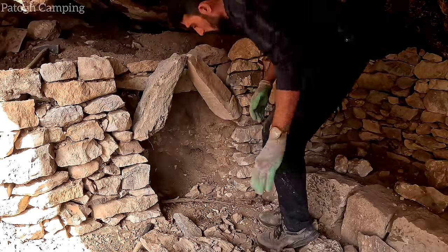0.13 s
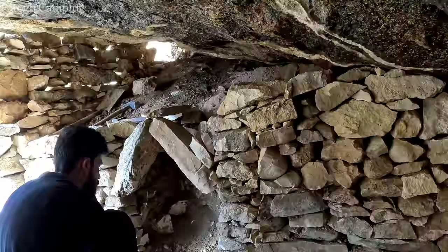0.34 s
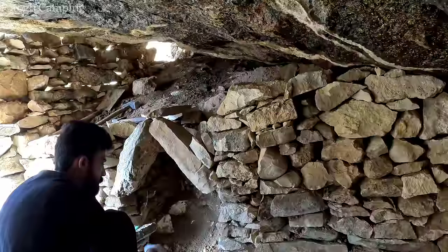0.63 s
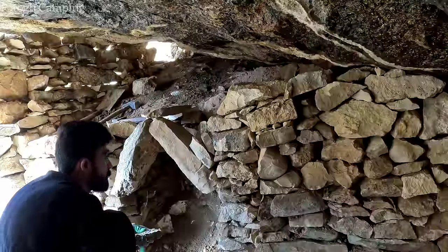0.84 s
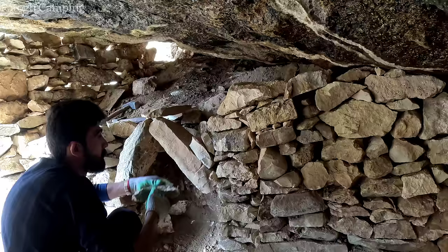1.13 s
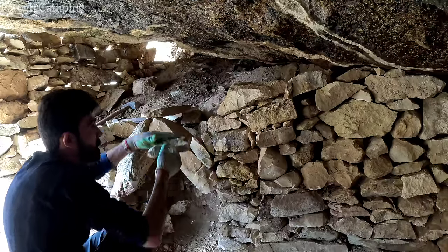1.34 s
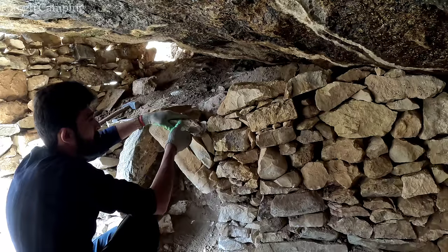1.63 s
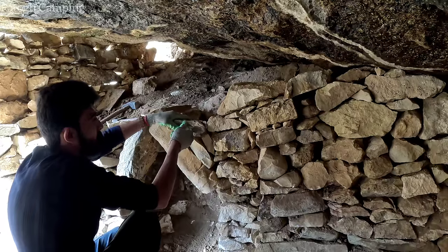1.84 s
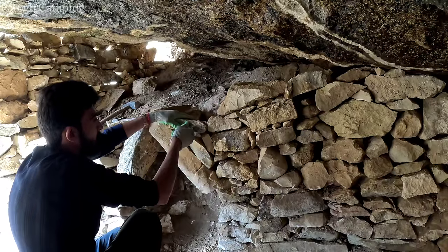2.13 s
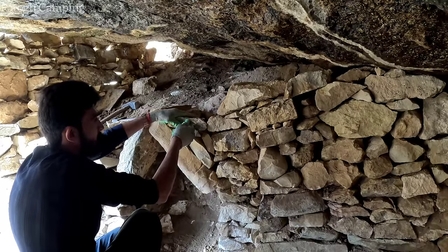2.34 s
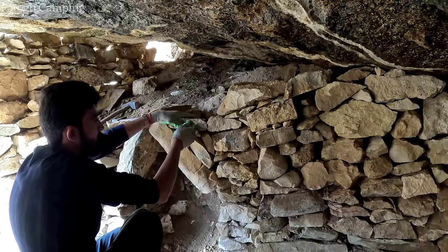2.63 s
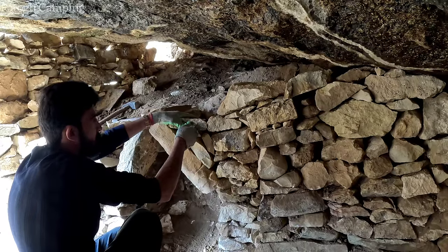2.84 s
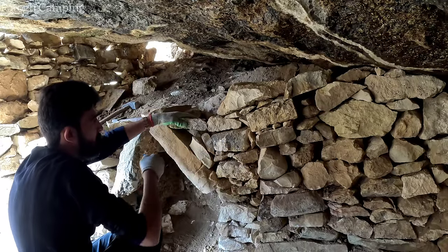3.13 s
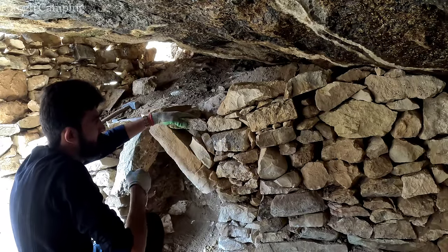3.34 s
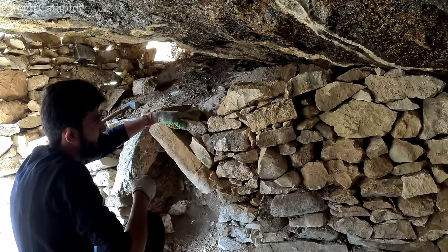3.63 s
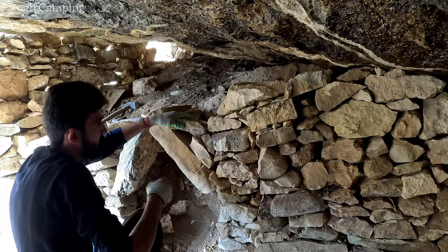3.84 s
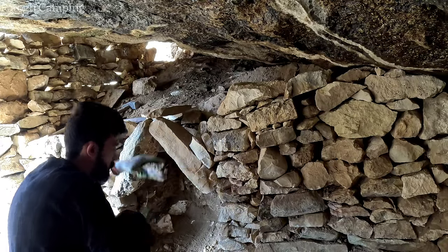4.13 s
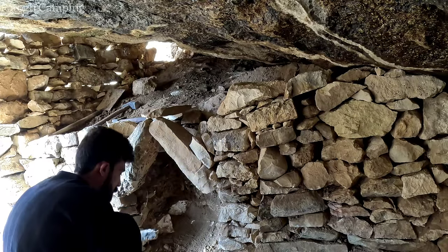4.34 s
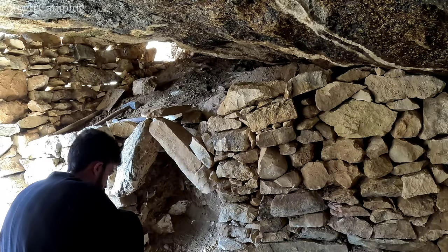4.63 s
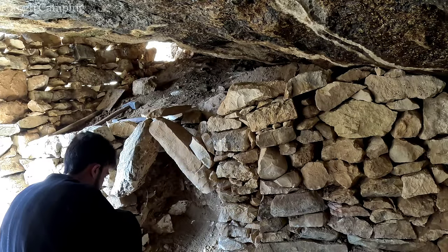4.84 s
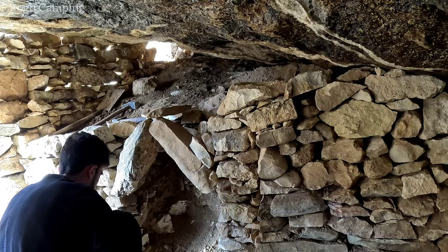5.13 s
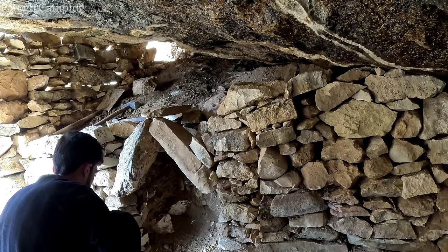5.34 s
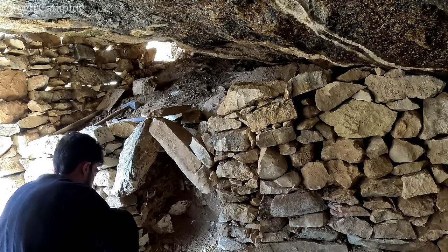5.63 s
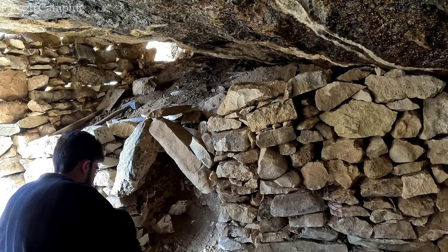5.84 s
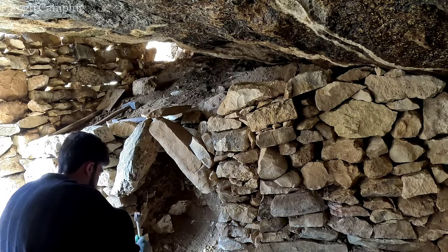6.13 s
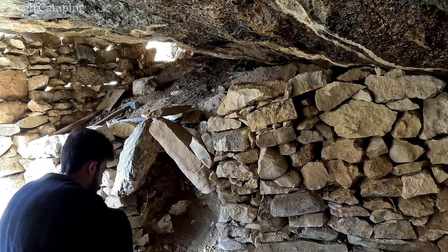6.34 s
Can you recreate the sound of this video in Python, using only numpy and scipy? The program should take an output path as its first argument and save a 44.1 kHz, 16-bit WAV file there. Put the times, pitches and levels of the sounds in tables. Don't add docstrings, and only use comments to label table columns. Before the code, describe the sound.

Dry stones clack and settle inside a rocky hollow, with soft sleeve rustle and faint breeze, building to three hard, heavy stone blows.

```python
import sys
import numpy as np
from scipy import signal
from scipy.fft import rfft, irfft, next_fast_len
from scipy.io import wavfile
from scipy.ndimage import uniform_filter1d

SR = 44100
rng = np.random.default_rng(int(sys.argv[2]) if len(sys.argv) > 2 else 0)


def invert_db(x):
    u = np.asarray(x, float) / 20
    return 10 ** u


def put_to_file(sound):
    columns = np.atleast_2d(sound).T
    safe = np.clip(columns, -1, 1)
    whole_steps = np.round(safe * 32767)
    wavfile.write(sys.argv[1], SR, whole_steps.astype(np.int16))


N = 285327
CUT_S = 0.266


def curve(table, hz):
    f, db = np.transpose(table)
    return invert_db(np.interp(np.log(hz + 1), np.log(f), db))


def band(size, lo_hz, hi_hz, colour=None):
    hz = np.fft.rfftfreq(size, 1 / SR) + 1e-3
    gain = 1 / np.sqrt((1 + (lo_hz / hz) ** 12) * (1 + (hz / hi_hz) ** 12))
    if colour:
        gain = gain * curve(colour, hz)
    x = irfft(rfft(rng.standard_normal(size)) * gain, size)
    return x / x.std()


def walk(rate):
    hold = int(SR / rate)
    levels = rng.standard_normal(N // 20)[:N // hold + 1]
    return 1.2 * uniform_filter1d(np.repeat(levels, hold), hold)[:N]


def add(out, s, x):
    i = int(s * SR)
    out[..., i:i + x.shape[-1]] += x[..., :out.shape[-1] - i]


def ring(modes, push, scatter_db):
    t = np.arange(8192) / SR
    hz, db, t60 = np.transpose(modes)[:, :, None]
    chance = rng.standard_normal((2, len(modes), 1))
    hz = hz * (1 + 0.001 * chance[1])
    share = np.abs(rfft(push, 8192))[(hz * 8192 / SR).astype(int)]
    decay = invert_db(db + scatter_db * chance[0] - 60 * t / t60)
    body = decay * np.sin(2 * np.pi * hz * t) / (share + 0.4 * share.mean())
    y = signal.fftconvolve(push, body.sum(axis=0))[:8192]
    return y / np.abs(y).max()


def bed(gains, colour, edges_hz, flicker_db, rate):
    out, shared = 0, walk(rate)
    for gain, lo, hi in zip(gains, edges_hz, edges_hz[1:]):
        rough = invert_db(flicker_db * (shared + 1.46 * walk(4 * rate)))
        pair = np.array([band(next_fast_len(N), lo, hi, colour)[:N] for _ in range(2)])
        out = out + gain * rough * pair
    return out


# start_s [s], gust_db [dB]
GUSTS = [(0.0, -57.5), (.13, -46.5), (0.36, -69), (0.859, -67.5), (1.66, -74), (2.139, -61.5),
         (2.721, -60.5), (2.9, -71.5), (3.5, -72.5), (3.691, -49.5), (3.86, -55), (3.95, -79), (4.36, -55),
         (4.921, -62.5), (5.28, -62.5), (5.8, -53.5), (6.001, -42), (6.47, -51.5)]
# freq_hz [Hz], density_db [dB per Hz]
AIR_COLOUR = [(18, -3.5), (38, -21), (62, -30), (105, -34), (140, -6), (190, -3.5), (350, -18.5),
              (900, -27)]
HUM_DB, HUM_GUST_SHARE = -41, 0.45
HUM_AFTER_THUD_DB, HUM_T60_S = -30.5, 0.42
AIR_FLICKER_DB = 1.5


def air():
    gust_db = np.interp(np.arange(N) / SR, *np.transpose(GUSTS))
    t = np.arange(SR) / SR
    hum = invert_db(HUM_DB + HUM_GUST_SHARE * np.minimum(gust_db, -60)) ** 2
    for s, db, _, _ in THUDS:
        add(hum, s, invert_db(db + HUM_AFTER_THUD_DB - 60 * t / HUM_T60_S) ** 2)
    gains = invert_db(gust_db), np.sqrt(hum)
    return bed(gains, AIR_COLOUR, [18, 70, 850], AIR_FLICKER_DB, 9)


# start_s [s], length_s
# [s], level_db [dB], fineness_db [dB]
RUBS = [(0, 0.16, -63, -0.5), (.19, .09, -71, 2.5), (0.323, 0.079, -76.5, 5), (0.428, 0.13, -64, -10),
        (0.553, 0.047, -65.5, -3.5), (1.009, 0.14, -67, -4.5), (1.174, 0.31, -66, -3),
        (1.348, 0.041, -58, -6.5), (1.476, 0.2, -70.5, -2), (1.922, 0.16, -69.5, -3.5),
        (5.119, 0.048, -64.5, -6.5), (3.986, 0.13, -78, 4.5), (4.072, 0.17, -61.5, -5.5),
        (4.27, 0.23, -67.5, -5), (4.514, 0.13, -62, -2.5), (4.709, 0.074, -62.5, -6.5),
        (4.827, 0.19, -60.5, -5.5), (5.247, 0.1, -64.5, -1.5), (5.384, 0.24, -62, -6),
        (5.66, 0.087, -65.5, 4), (5.788, 0.004, -49.5, 6.5), (5.79, 0.31, -68.5, -1.5),
        (6.131, 0.33, -66.5, -2)]
# freq_hz [Hz], density_db [dB per Hz]
WEAVE = [(800, -21), (1020, -8), (1250, -5), (1750, -10.5), (4370, -17), (7550, -13.5), (9440, -27),
         (15500, -44)]
STILL_DB = (-78, -82.5, -77)
RUB_ATTACK_S, RUB_RELEASE_S, RUB_MID_DB = 0.028, 0.027, 2.5
CLOTH_FLICKER_DB = 1.2


def cloth():
    t = np.arange(SR) / SR
    power = np.ones(N) * invert_db(np.array(STILL_DB))[:, None] ** 2
    for s, length, db, fine in RUBS:
        shape = np.minimum(t / RUB_ATTACK_S, 1) * np.exp(-np.maximum(t - length, 0) / RUB_RELEASE_S)
        if s < CUT_S:
            shape = shape[:int((CUT_S - s) * SR)]
        levels = db + np.array([[0], [RUB_MID_DB + fine], [fine]])
        add(power, s, (invert_db(levels) * shape) ** 2)
    return bed(np.sqrt(power), WEAVE, [850, 2000, 4500, 15500], CLOTH_FLICKER_DB, 30)


ROOF_T60_S, ROOF_DB, ROOF_DELAY_MS = 0.092, -17, 4.6


def roof(x):
    t = np.arange(12000) / SR
    echoes = []
    for _ in range(2):
        tail = band(len(t), 190, 6300) * invert_db(-60 * t / ROOF_T60_S) * (t > ROOF_DELAY_MS / 1000)
        echoes.append(signal.fftconvolve(x, tail / np.sqrt(np.sum(tail ** 2)))[:N])
    return np.array(echoes) * invert_db(ROOF_DB)


# freq_hz [Hz], level_db [dB]; then its decay
NEAR_STONES, NEAR_T60_S = [(300, -18), (1500, -14), (7000, -15), (11000, -3)], 0.02


def near(x):
    t = np.arange(2048) / SR
    h = rng.standard_normal(len(t)) * invert_db(-60 * t / NEAR_T60_S)
    h = h / np.sqrt(np.sum(h ** 2))
    return irfft(rfft(x) * rfft(h, N) * curve(NEAR_STONES, np.fft.rfftfreq(N, 1 / SR)), N)


# freq_hz [Hz], level_db [dB]
LEFT_LOUDER = [(200, 0), (380, .5), (550, -1.5), (900, 2.5), (2380, 2), (4400, 0), (8120, 2), (15000, 14)]
# freq_hz [Hz], phase_rad [radians]
LEFT_LEADS = [(100, -.05), (300, -.12), (900, -.15), (1720, -.65), (3000, -.8), (4800, -.35), (9100, 0)]


def ports(x):
    hz = np.fft.rfftfreq(N, 1 / SR)
    f, lead = np.transpose(LEFT_LEADS)
    phase = np.interp(np.log(hz + 1), np.log(f), lead)
    half = np.sqrt(curve(LEFT_LOUDER, hz)) * np.exp(0.5j * phase)
    return np.array([irfft(rfft(x) * half, N), irfft(rfft(x) / half, N)])


# start_s [s], peak_db [dB], swing_hz [Hz]
STAND_TAPS = [
    (0.6217, -31, 223),
    (1.221, -36, 197),
    (1.917, -41, 257),
    (1.9273, -16, 228),
]


def stand():
    out, t = np.zeros((2, N)), np.arange(4096) / SR
    sides = invert_db(np.array([[-0.6], [0.6]]))
    for s, db, hz in STAND_TAPS:
        dip = -0.6 * np.exp(-((t - 0.001) / 0.000092) ** 2)
        u = np.maximum(t - 0.0012, 0)
        swing = 1.01 * np.cos(2 * np.pi * hz * u) * np.exp(-u / 0.0017) - 0.5 * np.exp(-u / 0.0018)
        swing = (1 - np.exp(-u / 0.000091)) * swing
        late = np.maximum(t - 0.008, 0)
        settle = 0.2 * (1 - np.exp(-late / 0.0067)) * np.exp(-late / 0.0096)
        add(out, s - 0.001, (dip + swing + settle) * invert_db(db) * sides)
    return out


# start_s [s], peak_db [dB], pitch_hz [Hz], t60_s [s]
THUDS = [(0.068, -30.5, 167.2, 0.2), (0.306, -25.5, 200.4, 0.15), (0.322, -28, 217, 0.11),
         (.432, -35.5, 213, 0.098), (0.456, -36, 182, 0.086), (0.548, -31.5, 190, 0.043),
         (0.571, -33, 216, 0.19), (0.689, -34.5, 179, 0.15), (1.034, -43.5, 174.5, 0.29),
         (2.226, -42, 238, 0.091), (2.62, -46.5, 74.8, 0.17), (2.785, -40, 104, 0.11),
         (3.537, -37, 95.6, 0.39), (3.576, -29.5, 170, 0.018), (3.669, -27, 233, 0.14),
         (4.405, -41.5, 97.5, 0.079), (4.467, -44.5, 175, 0.34), (4.781, -20.5, 133, 0.07),
         (4.801, -29, 96, 0.16), (4.841, -34, 198.6, 0.3), (4.894, -27, 79, 0.14),
         (4.962, -32.5, 106, 0.23), (5.073, -20.5, 272, 0.087), (5.439, -36, 173, 0.26),
         (5.51, -36.5, 197, 0.14), (5.685, -33.5, 184, 0.12), (5.791, -25, 123, 0.18),
         (5.881, -26.5, 155, 0.047), (5.916, -16, 118, 0.094), (6.155, -38, 87.3, 0.49),
         (6.299, -30.5, 118.6, 0.18), (6.345, -10.5, 118, 0.1), (5.792, -24.5, 196, 0.14),
         (5.917, -15.5, 194, 0.079), (6.346, -16, 189, 0.092)]
# start_s [s], peak_db [dB], pitch_hz [Hz], t60_s [s]
STEPS = [
    (0.082, -34, 115, 0.23),
    (0.18, -44.5, 150, 0.17),
    (0.56, -38, 88, 0.48),
    (0.16, -40, 80, 0.27),
    (0.25, -34.5, 580, 0.26),
]
# freq_hz [Hz], level_db [dB]
HOLLOW = [(165, -5), (245, -11), (95, -14)]
SOIL_RISE_S = 0.004


def ground():
    out = np.zeros(N)
    for s, db, hz, t60 in THUDS + STEPS:
        modes = [(hz, 0, t60)] + [(f, g, t60) for f, g in HOLLOW]
        y = ring(modes, np.hanning(256), 2.0)
        y = invert_db(db) * y * (1 - np.exp(-np.arange(len(y)) / SR / SOIL_RISE_S))
        if s < CUT_S:
            y = y[:int((CUT_S - s) * SR)]
        add(out, s, y)
    return signal.sosfilt(signal.butter(2, 62, "high", fs=SR, output="sos"), out)


# start_s [s], peak_db [dB], coarseness_db [dB], t60_s [s]
CRUNCHES = [(0.001, -40.5, 0, 0.1), (0.037, -31.5, -19, 0.087), (0.0472, -40.5, 3.5, 0.3),
            (0.065, -41, 13, 0.14), (0.0797, -33, 7, 0.089), (0.0907, -21, -10.5, 0.061),
            (0.163, -40, -3.5, 0.22), (0.818, -49.5, -16, 0.26), (1.0407, -51, -14, 0.14),
            (1.096, -49.5, -9, 0.035), (1.3707, -62.5, 10.5, 0.087), (2.135, -57, 0.5, 0.091),
            (2.207, -74.5, 28.5, 0.14), (2.379, -43, -42, 0.088), (2.4224, -43, -37, 0.074),
            (2.734, -53, -8.5, 0.44), (2.7669, -58, 10, 0.14), (2.9568, -54.5, -6.5, 0.12),
            (3.069, -56, -28, 0.13), (3.6947, -65.5, 30, 0.036), (3.8568, -52, -14.5, 0.18),
            (4.5088, -51, -19, 0.68), (5.46, -52, -1, 0.32)]
# freq_hz [Hz], density_db [dB per Hz]
GRIT = [(2350, -44), (4000, -21), (4660, -27), (4960, -8), (7900, -3.5), (9360, -21.5), (10500, -22),
        (15500, -56)]
COARSE_SHARE, COARSE_MID_DB, COARSE_TOP_DB = 0.79, -9, -7


def grit():
    out, t = np.zeros(N), np.arange(8192) / SR
    for s, high, coarse, t60 in CRUNCHES:
        low = high + coarse
        mid = high + COARSE_SHARE * min(coarse, COARSE_TOP_DB) + COARSE_MID_DB
        grains = uniform_filter1d(invert_db(np.repeat(rng.standard_normal(128), 64)), 48)
        mix = invert_db(high - 7.5) * band(8192, 4000, 17000, GRIT)
        mix += invert_db(low - 7) * band(8192, 210, 1320)
        mix += invert_db(mid + 6) * band(8192, 1300, 4500)
        shape = np.minimum(t / 0.00032, 1) * invert_db(-60 * t / max(t60, 0.01))
        add(out, s - 0.001, mix * grains * shape)
    return out


# start_s [s], length_s [s], level_db [dB], from_hz [Hz], to_hz [Hz]
DRAGS = [(1.24, 0.18, -68.5, 1200, 1157), (1.369, 0.12, -68, 2450, 2565), (1.528, 0.2, -72.5, 1400, 1313),
         (2.036, 0.12, -74, 1150, 1250), (2.725, 0.055, -63, 1310, 1474), (2.737, 0.052, -68, 2400, 2340),
         (2.937, 0.039, -69, 1620, 1480), (4.029, 0.06, -72.5, 1420, 1330), (4.096, 0.096, -69, 1133, 1397),
         (4.098, 0.13, -73, 2560, 2740), (4.193, 0.033, -60, 1283, 1450), (5.968, 0.23, -68.5, 1910, 1515)]
DRAG_WIDTH_SHARE, DRAG_GRAIN_DB, DRAG_EDGE_S = 0.14, 4, 0.0026


def drags():
    out, t = np.zeros(N), np.arange(16384) / SR
    for s, length, db, from_hz, to_hz in DRAGS:
        hz = from_hz + (to_hz - from_hz) * np.minimum(t / length, 1)
        turn = 2 * np.pi * np.cumsum(hz) / SR
        a, b = (band(len(t), 1, DRAG_WIDTH_SHARE * from_hz) for _ in range(2))
        grains = uniform_filter1d(invert_db(DRAG_GRAIN_DB * np.repeat(rng.standard_normal(64), 256)), 128)
        shape = np.clip(np.minimum(t, length + DRAG_EDGE_S - t) / DRAG_EDGE_S, 0, 1)
        add(out, s, invert_db(db) * shape * grains * (a * np.cos(turn) + b * np.sin(turn)))
    return out


# start_s [s], peak_db [dB]
TOUCHES = [(2.432, -50), (2.462, -68.5), (2.5, -68.5), (3.488, -66), (3.506, -58), (3.54, -42.5),
           (3.565, -70), (3.589, -61), (3.622, -56.5), (3.65, -85), (3.68, -66)]


def touches():
    out = np.zeros(N)
    for s, db in TOUCHES:
        push = np.hanning(512) * rng.standard_normal(512)
        add(out, s - 0.003, invert_db(db) * ring([(5120, 2, 0.053), (6600, -23.5, 0.058)], push, 1.2))
    return out


# start_s [s], peak_db [dB], from_hz [Hz], to_hz [Hz], t60_s [s]
SPECKS = [
    (0.3069, -36.5, 8150, 10600, .06),
    (3.07, -61.5, 4610, 6260, 0.079),
    (3.254, -54.5, 3200, 4240, 0.094),
    (3.856, -58.5, 8370, 10340, 0.066),
    (4.783, -57, 10500, 12300, 0.083),
    (5.657, -61, 9900, 12500, 0.056),
    (.307, -64, 12900, 14500, .12),
    (5.798, -35.5, 4500, 9300, 0.085),
    (6.343, -39.5, 6900, 8250, 0.049),
]


def specks():
    out, t = np.zeros(N), np.arange(8192) / SR
    for s, db, lo_hz, hi_hz, t60 in SPECKS:
        shape = invert_db(db - 60 * t / t60) * np.minimum(t / 0.00086, 1)
        add(out, s - 0.001, shape * band(len(t), lo_hz, hi_hz))
    return out


# start_s [s], peak_db [dB], pitch_hz [Hz], t60_s [s]
CRACKS = [
    (0.3052, -13, 3210, .006),
    (0.3063, -17, 3347, .025),
    (0.3109, -19.5, 2806, .02),
    (5.9176, -8.5, 1750, .008),
]


def cracks():
    out, t = np.zeros(N), np.arange(2048) / SR
    for s, db, hz, t60 in CRACKS:
        tone = np.sin(2 * np.pi * hz * t) * np.minimum(t * hz, 1)
        add(out, s, invert_db(db - 60 * t / t60) * tone)
    return out


# start_s [s], peak_db [dB], pitch_hz [Hz], t60_s [s]
CLINKS = [(0.309, -25.5, 1690, 0.031), (.308, -47, 770, 0.14), (.46, -28, 863, 0.02),
          (.46, -39, 3580, 0.023), (.494, -47, 1970, 0.12), (.494, -36.5, 941, .05), (.52, -50, 3680, .04),
          (0.55, -36, 1000, 0.019), (.552, -48, 3620, 0.018), (.567, -48, 794, 0.052),
          (.581, -45, 3630, .025), (0.687, -41, 3570, 0.029), (3.51, -62, 2653, .12),
          (3.512, -51, 477, 0.057), (3.537, -32.5, 1230, 0.016), (3.576, -37, 1060, 0.049),
          (3.655, -55.5, 835, 0.027), (3.667, -40.5, 2270, 0.024), (3.667, -33, 814, 0.022),
          (3.694, -39, 512, 0.07), (3.51, -58, 3660, 0.11), (3.668, -49.5, 3120, 0.026),
          (4.782, -30, 7900, 0.055), (4.782, -32, 5518, 0.035), (4.781, -48, 6595, .06),
          (4.782, -33, 5100, 0.11), (4.844, -30.5, 6580, 0.059), (4.843, -38, 4980, .06),
          (4.944, -42.5, 1780, 0.046), (4.945, -41, 1000, 0.024), (5.069, -26.5, 5130, 0.051),
          (5.071, -27.5, 6560, 0.036), (5.071, -23.5, 1244, 0.045), (5.127, -44.5, 6630, 0.052),
          (5.974, -41, 810, 0.026), (5.975, -44, 1403, 0.05), (6.113, -56, 6630, 0.051)]
CLINK_PUSH_MS = 2.4
BEAT_SHARE, BEAT_DEPTH = 0.012, 0.6


def clinks():
    out, size = np.zeros(N), int(CLINK_PUSH_MS * SR / 1000)
    for s, db, hz, t60 in CLINKS:
        y = ring([(hz, 0, t60)], np.hanning(size) * rng.standard_normal(512)[:size], 0)
        t = np.arange(len(y)) / SR
        y = y * (1 - BEAT_DEPTH * np.sin(np.pi * BEAT_SHARE * hz * t) ** 2)
        around = signal.butter(2, [0.8 * hz, 1.2 * hz], "band", fs=SR, output="sos")
        add(out, s - 0.002, invert_db(db) * signal.sosfilt(around, y))
    return out


SOFT_BLUR, SOFT_BELOW_DB = 0.4, -32


def knocks(hits, modes, blur, offset_db, scatter_db, dense_db, dense_t60, edge_share):
    out, t = np.zeros(N), np.arange(8192) / SR
    edges = ((820, 2100), (2100, 4600), (4600, 14000))
    for s, low, edge, seat, ms in hits:
        tau = max(ms, 0.3) / 1000
        clear = invert_db(SOFT_BLUR * min(low - SOFT_BELOW_DB, 0))
        spray = np.sqrt(t / tau) * np.exp(0.5 - 0.5 * t / tau)
        chatter = rng.standard_normal(len(t)) * spray ** 2
        tail = np.minimum(t / tau, 1) * 0.38 * invert_db(-60 * t / dense_t60)
        fade = np.maximum(spray ** 2, tail)
        levels = low, low + edge + offset_db[1], low + edge_share * edge + offset_db[2]
        for (lo, hi), db, dense in zip(edges, levels, dense_db):
            y = ring([m for m in modes if lo <= m[0] < hi], chatter, scatter_db)
            y = signal.sosfilt(signal.butter(3, [lo, min(1.1 * hi, 8800)], "band", fs=SR, output="sos"), y)
            add(out, s - 0.0018, invert_db(db) * (clear * y + invert_db(dense) * band(len(t), lo, hi, blur) * fade))
        add(out, s - 0.001, invert_db(low + seat + offset_db[0]) * band(len(t), 160, 690) * fade)
    return out


# start_s [s], peak_db [dB], edge_db [dB], seating_db [dB], chatter_ms [ms]
PEBBLE_HITS = [(.3065, -32.5, 18, -7, 2.15), (.431, -47, -12, -4, 4.6), (.459, -26, -8.5, -22, 2),
               (.493, -40, -19, 2, 1.9), (.518, -51.5, 9.5, -19, 2.7), (.552, -42.5, -26, -8, 3.2),
               (.579, -49, 3, -3, 1.6), (.653, -56, 13.5, -6, 2.6), (.686, -35.5, -15.5, -19.5, 4.1),
               (2.381, -77, 22.5, 5.5, 4.7), (3.249, -72, 24.5, -2.5, 6.7)]
# freq_hz [Hz], level_db [dB], t60_s [s]
PEBBLE = [(950, -8, .02), (1330, -3, .018), (1960, 0, .018), (2770, -3, .015), (3310, 0, .015),
          (3800, -3, .015), (5950, 0, .012)]
# freq_hz [Hz], density_db [dB per Hz]
CHIPS = [(700, -4), (1230, -10.5), (3000, -5.5), (5110, -9), (7510, 2), (10200, -12.5), (12000, -18),
         (15000, -36.5)]
SPLINTER_HZ = 3520
SMALL_SCATTER_DB = 4


def pebbles():
    small = dict(offset_db=(-3, -2.5, -17), scatter_db=SMALL_SCATTER_DB, dense_db=(-9, -3, 3),
                 dense_t60=0.082, edge_share=1.0)
    splinters = knocks(PEBBLE_HITS[-2:], PEBBLE, CHIPS, **small)
    splinters = signal.sosfilt(signal.butter(4, SPLINTER_HZ, "high", fs=SR, output="sos"), splinters)
    return knocks(PEBBLE_HITS[:-2], PEBBLE, CHIPS, **small) + splinters


# freq_hz [Hz], density_db [dB per Hz]
RUBBLE = [(410, -31), (700, -13), (1830, -9.5), (3090, -9), (4500, -19.5), (7460, -19), (10600, -44),
          (15600, -49)]
# start_s [s], peak_db [dB], edge_db [dB], seating_db [dB], chatter_ms [ms]
BLOCK_HITS = [
    (3.576, -40, -6, -3.5, 0.88),
    (5.069, -29.5, -11.5, -15, 4.2),
    (5.077, -40.5, 3.5, -2, 2.5),
    (5.8, -41, 0, -4, 4.3),
    (6.349, -19, -6.5, -7.5, 1.47),
]
# freq_hz [Hz], level_db [dB], t60_s [s]
BLOCK = [(1000, -12, .03), (1430, -3, .035), (1620, -3, .035), (1840, 0, .035), (2080, -2, .03),
         (2315, 0, .03), (2700, -1, .03), (3400, -3, .025), (4390, -6, .02), (5070, 0, .03),
         (6610, -4, .025), (7700, -9, .02)]
BLOCK_SCATTER_DB = 4


def block():
    return knocks(BLOCK_HITS, BLOCK, RUBBLE, offset_db=(-3, 3.5, -1), scatter_db=BLOCK_SCATTER_DB,
                  dense_db=(-6, -1, -3), dense_t60=0.091, edge_share=1.64)


# start_s [s], peak_db [dB], edge_db [dB] (sharp corner high, flat face
# low), seating_db [dB], chatter_ms [ms]
SLAB_HITS = [(1.023, -49, -6, -19, 5.5), (1.991, -45, -8.5, -10, 2.8), (2.006, -54.5, 7, 2, 2.4),
             (2.43, -55.5, 2, -9.5, 2), (3.509, -60.5, -5, 5, 4), (3.539, -39, -5, 2, 0.32),
             (3.666, -31, -23, -6, 1.45), (4.381, -49, -12, -26, 14), (4.7835, -23.5, -11, -8.5, 1.32),
             (4.802, -18.5, -44, -16.5, 1.9), (4.843, -26.5, -18.5, -9.5, 3.7),
             (4.8995, -21, -23.5, -19, 1.4), (4.961, -37.5, -17, -8, 7), (4.987, -45, -5.5, -1, 3.6),
             (5.126, -49.5, 11.5, -28, 3.7), (5.555, -43.5, -13, -7.5, 3.3), (5.672, -39.5, -25, -13, 12.4),
             (5.69, -37.5, -17, -10, 2.8), (6.152, -28.5, -54, -54, 4.2), (6.21, -39.5, -31, -17, 1.2),
             (6.23, -42, -11, -17, 2.5), (6.286, -32.5, -21, -24, 1.3),
             (4.83, -31.5, -41, -5, 1.2),
    (4.881, -44, -19, -3, 6.1),
    (5.778, -42.5, -30, -33, 3.5),
    (5.881, -34, -50, -12, 1.4),
    (5.9, -36.5, -24, -18, 23),
    (6.303, -35.5, -10.5, -9, 2.1),
    (6.311, -26.5, -22, -21, 3),
]
# freq_hz [Hz], level_db [dB], t60_s [s]
SLAB = [(1002, 12, 0.039), (1264, -8, 0.065), (1416, -2, 0.054), (1716, -14, 0.085), (2240, -48.5, 0.013),
        (2750, -2.5, 0.011), (3620, -13, 0.026), (5100, 7, 0.047), (5518, 0, 0.035), (6530, 5, 0.081),
        (7550, -11, 0.027)]
SLAB_SCATTER_DB = 4.5


def slab():
    return knocks(SLAB_HITS, SLAB, RUBBLE, offset_db=(-3, -3.5, 1), scatter_db=SLAB_SCATTER_DB,
                  dense_db=(-12, -8, -10), dense_t60=0.13, edge_share=0.76)


# start_s [s], peak_db [dB], blur_db [dB], chatter_ms [ms], blur_t60_s [s]
HEAVY_HITS = [
    (5.789, -9, -10.5, 3.25, 0.095),
    (5.914, -10.5, -3, 2.5, 0.06),
    (6.343, -9.5, -3.5, 1.36, 0.056),
]
# freq_hz [Hz], level_db [dB], t60_s [s]
HEAVY = [
    [(1011, -1.5, 0.066), (1299, 0, 0.038), (1420, 3, 0.028), (1730, -17, 0.016), (2208, 0, 0.0093),
     (4805, -18, 0.061), (6616, -20.5, 0.12), (7300, -38, .06)],
    [(1000, -8, 0.042), (1230, -8, 0.039), (1450, -9, 0.08), (1620, -11, 0.055), (1960, -3.5, 0.021),
     (2094, -9, 0.028), (2340, -3, 0.018), (2560, -6.5, 0.033), (2680, 1, 0.018), (2850, -20, 0.062),
     (3820, -24, 0.013), (4720, -19, 0.028), (6340, -30, 0.036), (9820, -25, 0.065)],
    [(766, -18, 0.082), (1290, -21, 0.098), (1690, -22, .05), (2257, -2.5, 0.081), (2450, -11, .045),
     (3000, 1, 0.038), (3350, 16, 0.014), (3800, 2, 0.05), (4900, -16.5, 0.031), (6460, -13, 0.048),
     (7330, -4, 0.077), (7900, -11, 0.054)],
]
# freq_hz [Hz], density_db [dB per Hz]
HEAVY_BLUR = [
    [(300, -19), (780, -26), (1020, -3), (1940, -2.5), (3340, -28), (7500, -17.5), (11000, -59),
     (15500, -85)],
    [(180, -42), (300, -29), (794, -28), (1620, 9.5), (3690, -21.5), (5130, -7), (6900, -70), (10100, -31),
     (15500, -74)],
    [(180, -35), (300, -16), (892, -3), (1370, 0), (2210, 4), (4490, -22), (7800, -4.5), (10000, -58),
     (15500, -80)],
]


def heavy():
    out, t = np.zeros(N), np.arange(8192) / SR
    body = signal.butter(4, [640, 8600], "band", fs=SR, output="sos")
    for (s, db, blur_db, ms, t60), modes, blur in zip(HEAVY_HITS, HEAVY, HEAVY_BLUR):
        tau = ms / 1000
        spray = t / tau * np.exp(1 - t / tau)
        fade = np.minimum(t / tau, 1) * invert_db(blur_db - 60 * t / t60)
        clear = signal.sosfilt(body, ring(modes, rng.standard_normal(len(t)) * spray, 0))
        add(out, s - 0.001, invert_db(db) * (clear + fade * band(len(t), 200, 15500, blur)))
    return out


# freq_hz [Hz], level_db [dB]
WIDTH = [(60, -10.5), (250, -3), (1000, -6), (3000, -10.5), (8000, -12), (13000, -7)]


def scene():
    far = signal.butter(4, 11000, fs=SR, output="sos")
    stones = signal.sosfilt(far, slab() + block() + heavy() + clinks())
    stones += pebbles() + grit() + touches() + drags() + specks() + cracks()
    mid, other = air() + cloth()
    side = irfft(rfft(other) * curve(WIDTH, np.fft.rfftfreq(N, 1 / SR)), N)
    echo = roof(stones)
    side = side + 0.46 * echo[1] + near(stones + echo[0])
    return ports(stones + ground() + echo[0] + mid) + np.array([side, -side]) + stand()


def low_pass(x):
    return signal.sosfilt(signal.butter(12, 15770, fs=SR, output="sos"), x)


def record(dry):
    mix = signal.sosfilt(signal.ellip(8, 0.2, 60, 15600, fs=SR, output="sos"), dry)
    return low_pass(mix)


dry = scene()
out = record(dry)
put_to_file(out)
```